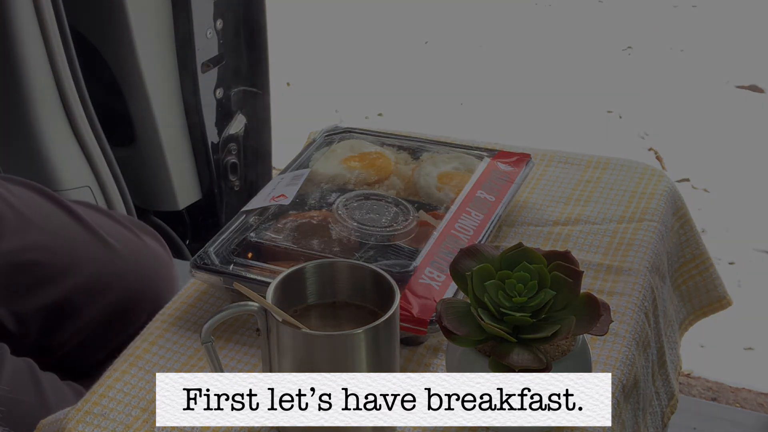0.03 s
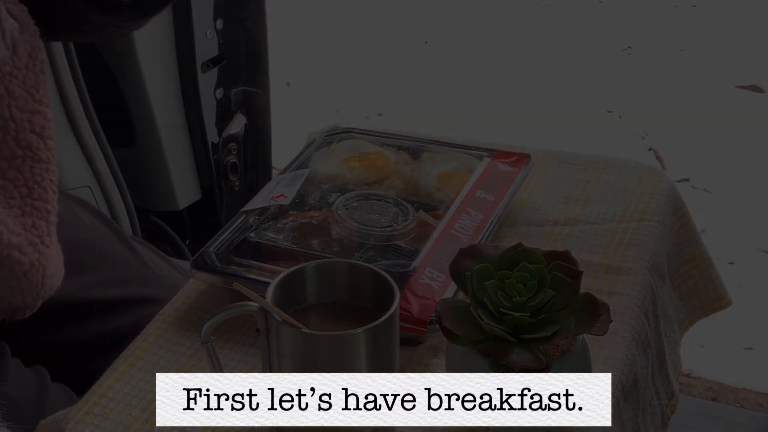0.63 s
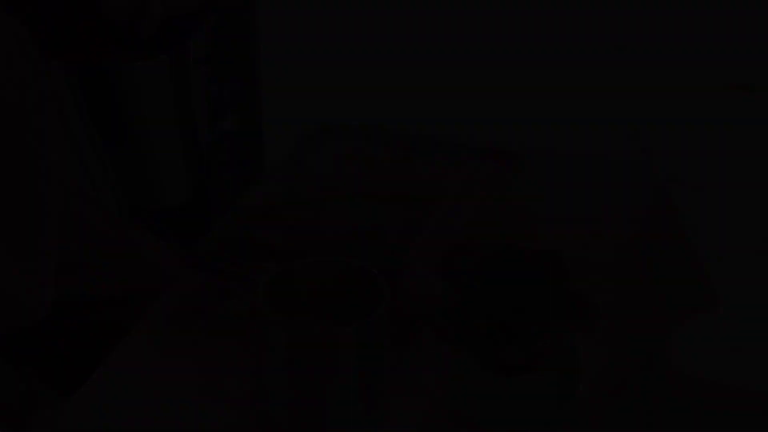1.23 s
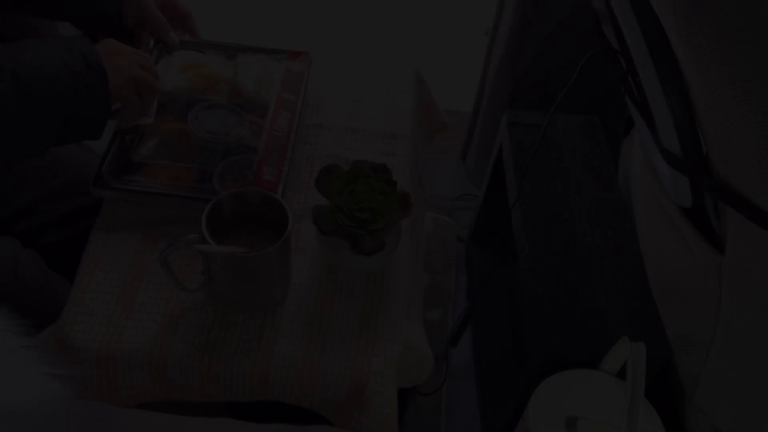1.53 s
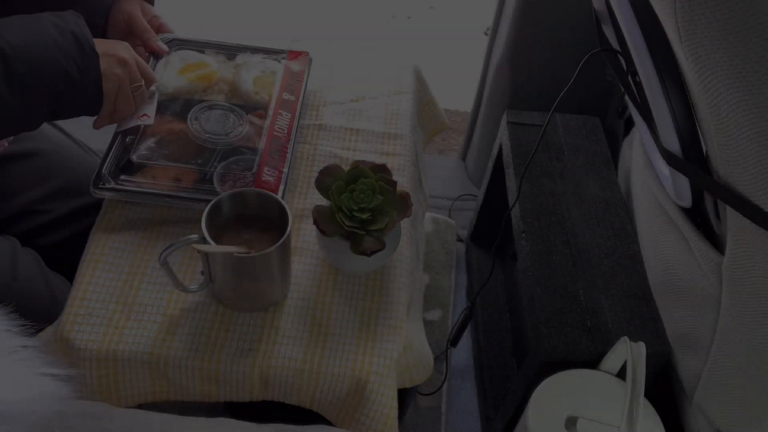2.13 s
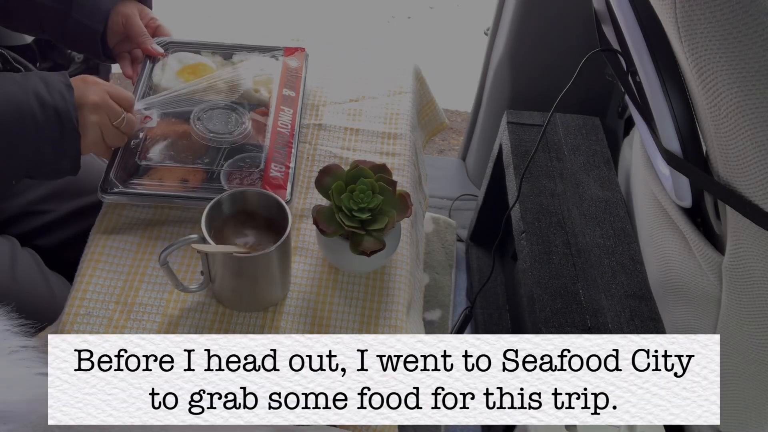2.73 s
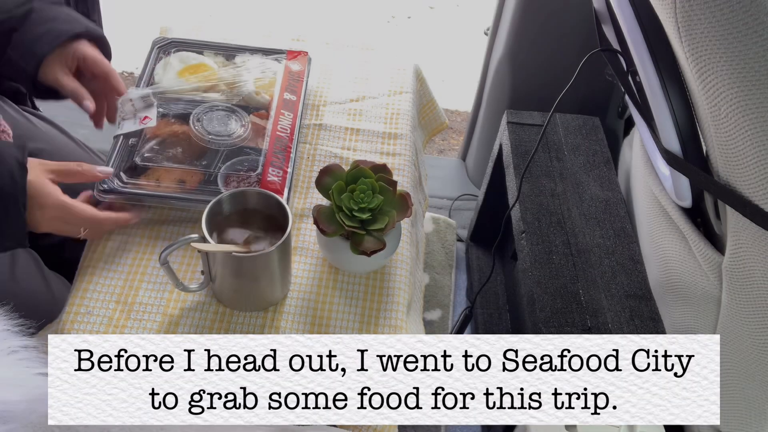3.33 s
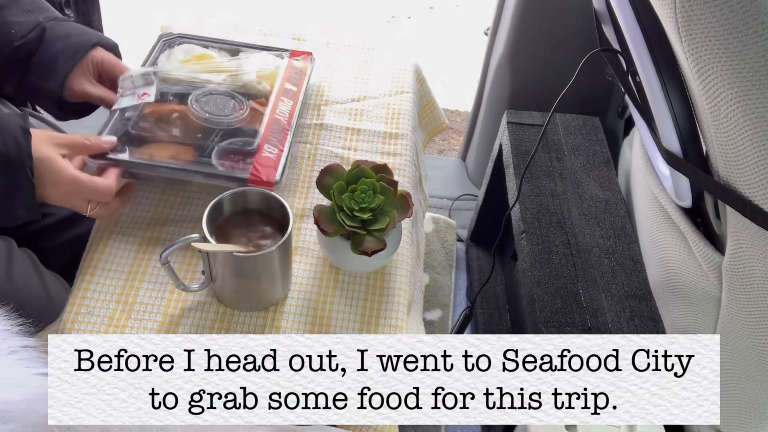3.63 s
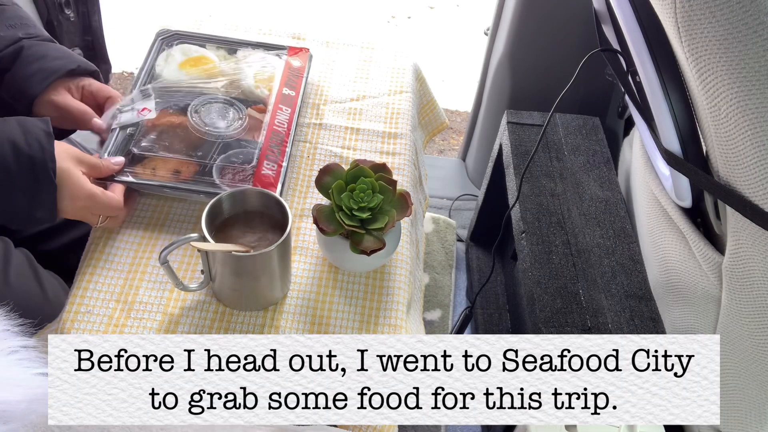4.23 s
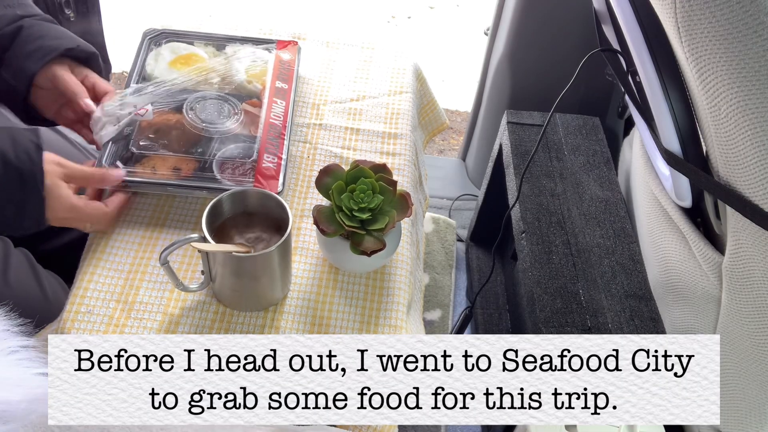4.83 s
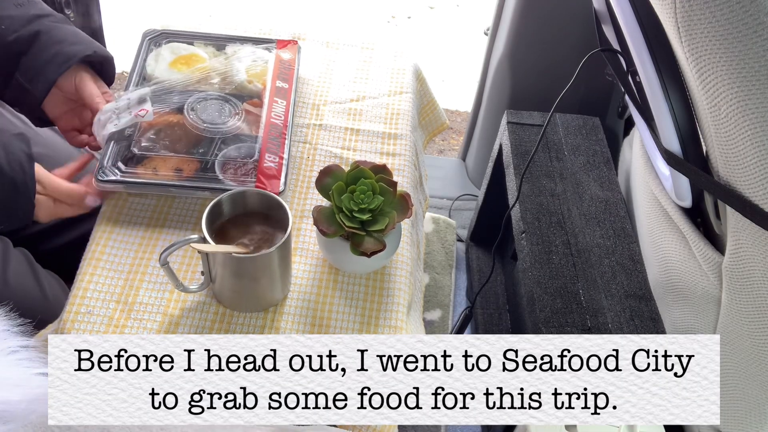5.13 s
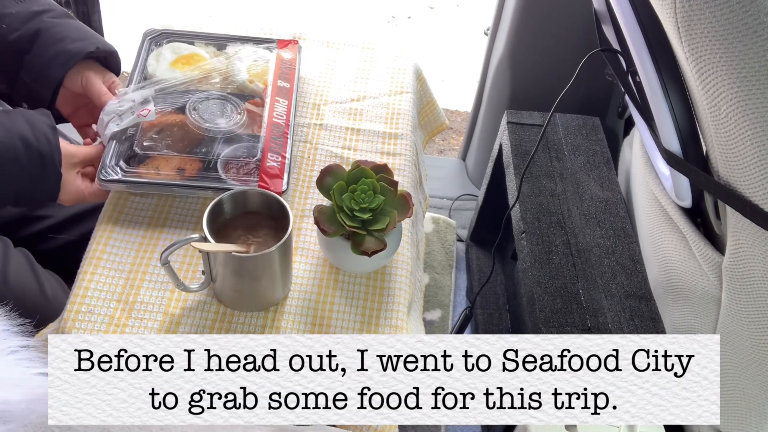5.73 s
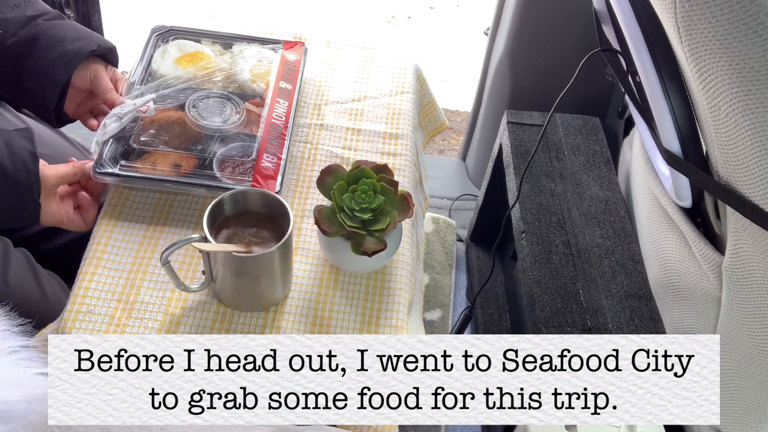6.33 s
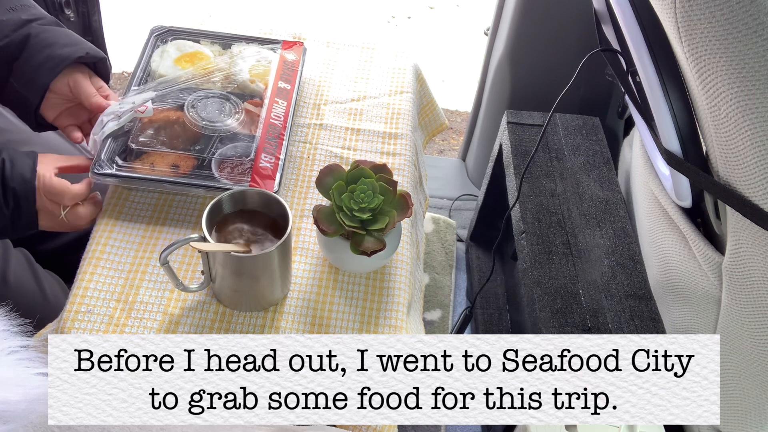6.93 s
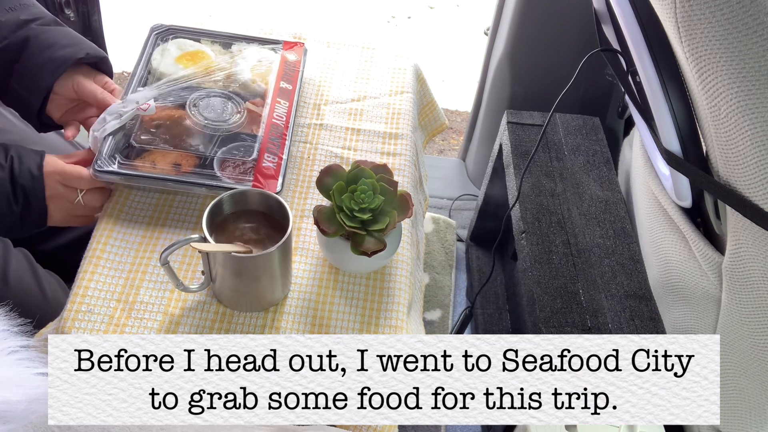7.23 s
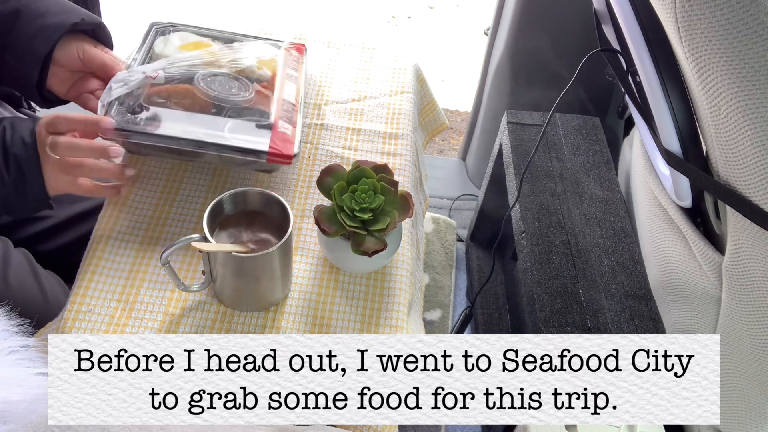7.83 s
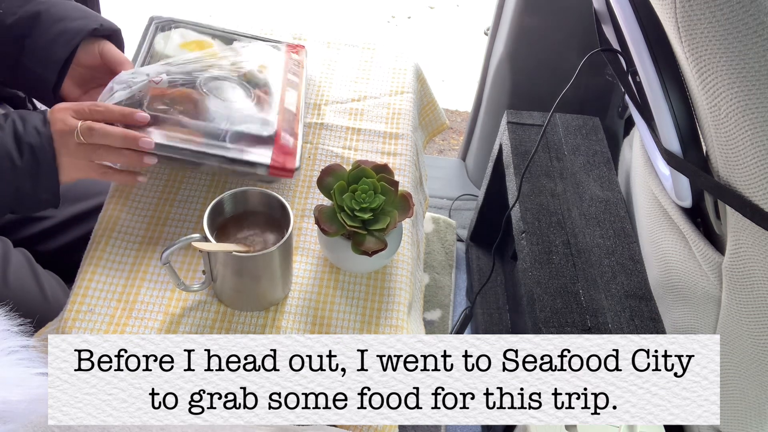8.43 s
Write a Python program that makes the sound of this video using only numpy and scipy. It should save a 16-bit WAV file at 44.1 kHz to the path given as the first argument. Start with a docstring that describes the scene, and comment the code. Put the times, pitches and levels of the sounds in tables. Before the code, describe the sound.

A soft hiss and low drone die down over the first second, leaving the hush of a parked car. From about 1.3 to 3 seconds the microphone is moved: low rumble, scuffs and several dull knocks, with a faint wavering whine until 2 seconds. Meanwhile, close by, hands begin picking cling film off a plastic meal tray. From 2 to 3.2 seconds the film crinkles and buckles in sharp snaps that make the stiff lid and tray ring briefly. After a few scattered clicks, the densest crackling runs from 4 to 5 seconds, strongest around 4.5. Lighter tugs, ticks and small pops continue until about 7 seconds, with fingers rubbing and dragging on the plastic between them. The handling goes softer, then two sharp cracks come at about 7.8 and 8 seconds, followed by a little fine crinkling until around 8.5.

```python
"""A soft hiss and a low drone die down, then hands pick cling film off a plastic meal tray.
Folds of film buckle in sharp snaps that set the stiff lid and the tray ringing.
Between the snaps the film crinkles and fingers rub and drag, all inside a quiet parked car.
Early on the camera rumbles, knocks and faintly whines while it is moved."""
import sys
import numpy as np
from scipy import signal
from scipy.fft import rfft, irfft, next_fast_len
from scipy.io import wavfile
from scipy.ndimage import map_coordinates

SR = 44100
rng = np.random.default_rng(int(sys.argv[2]) if len(sys.argv) > 2 else 0)


def output_pcm(signal):
    """Save a mono or channel-first signal as 16-bit PCM at the path in sys.argv[1].

    Samples are clipped to [-1, 1] before scaling.
    """
    pcm = np.clip(np.atleast_2d(signal).T, -1, 1) * 32767
    wavfile.write(sys.argv[1], SR, np.round(pcm).astype(np.int16))


N = 373968

# the background hiss dying down: time_s, level_db
HISS_LEVELS = [(0, -60), (0.12, -59.5), (0.3, -64), (0.5, -67.5), (0.62, -74), (0.9, -75.5), (1.05, -73.5)]
# the tone of each noise, from bass to treble: pitch_hz, level_db
HISS_TONE = [(100, -5.5), (250, -7.5), (550, -0.5), (1100, -6.5), (2000, -8.5), (3800, -9), (6000, -9.5),
             (9000, -25.5), (12000, -18), (16000, -22.5)]
DRONE_TONE = [(20, -15), (45, -6), (65, 0.5), (95, -1), (140, -11), (250, -18.5), (500, -57)]
RUMBLE_TONE = [(18, -16), (29, -10), (45, 1.5), (70, 4.5), (100, -1), (140, -15.5), (300, -33)]
SCUFF_TONE = [(90, -0.5), (160, -1), (310, 1.5), (430, -3.5), (600, -13.5), (1000, -18), (2500, -33.5)]
RUB_TONE = [(150, -6), (330, 8.5), (540, 11.5), (800, 4.5), (1100, 0), (1500, -24), (2300, 5), (3800, 7),
            (5200, 2.5), (7000, 2), (9500, -69), (15000, 0.5)]
# how alike a noise is in the two ears: pitch_hz, likeness (1 means the same)
EAR_LIKENESS = [(60, 0.93), (200, 0.62), (400, 0.5), (700, 0.19), (1500, 0.45), (3500, 0.17), (6500, 0.047),
                (9500, 1), (15000, 1)]
# fingers and tray dragging: start_s, end_s, level_db, slips_per_s, ring_hz
DRAGS = [(1.039, 1.105, -70, 120, 1100), (1.149, 1.205, -69, 99, 1240), (1.785, 1.827, -51.5, 295, 1040),
         (1.867, 1.909, -52, 220, 3440), (3.356, 3.47, -57.5, 340, 1130), (3.44, 3.493, -53, 470, 2850),
         (3.492, 3.56, -61, 260, 1140), (3.736, 3.784, -52, 260, 2540), (5.557, 5.68, -74.5, 260, 1820),
         (5.741, 5.815, -58, 190, 3780), (6.453, 6.508, -67, 280, 2320), (7.22, 7.324, -66.5, 182, 1720),
         (7.479, 7.562, -59, 210, 1240), (7.629, 7.7, -56, 265, 3740), (7.757, 7.792, -51.5, 340, 3170),
         (7.909, 7.978, -69, 340, 1100), (8.12, 8.195, -57.5, 330, 3600), (8.181, 8.231, -54.5, 280, 1700),
         (8.272, 8.374, -57, 167, 3830)]
# the camera is gripped, moved and let go: time_s, rumble_db, scuff_db
GRIP_LEVELS = [(1.04, -66, -65), (1.315, -68, -84), (1.34, -39, -56.5), (1.8, -50.5, -51),
               (2.08, -44, -40.5), (2.28, -33, -65), (2.55, -54, -54.5), (2.95, -51.5, -67.5),
               (3.17, -59.5, -57.5)]
# bumps on the camera: start_s, thud_db, knock_db, decay_s
CAMERA_BUMPS = [(1.075, -75, -59, 0.039), (1.168, -74, -58.5, 0.039), (1.391, -57, -39, 0.041),
                (2.022, -33.5, -30, 0.018), (2.178, -48, -30, 0.056), (2.242, -29.5, -58, 0.098),
                (2.723, -27, -54, 0.059)]
# the camera wobbling on its mount: pitch_hz, level_db
MOUNT_WOBBLES = [(29, 1.5), (71, 4), (87, -4.5)]
# the faint whine of the mount: time_s, pitch_hz, level_db
MOUNT_WHINE = [(1.31, 850, -99), (1.34, 825, -65), (1.45, 785, -66), (1.53, 768, -57), (1.6, 777, -68),
               (1.75, 801, -69), (1.94, 821, -62), (2.05, 858, -63)]
# the louder folds buckling: start_s, slip_ms, tray_db, lid_db, film_db, pitch_hz
BIG_FOLDS = [(1.2, 0.98, -64, -61, -90, 570), (1.4345, 0.22, -50.5, -43.5, -62, 3900),
             (1.6954, 1.6, -56, -55.5, -54, 4930), (1.8077, 3, -44.5, -48, -54, 750),
             (1.8773, 0.23, -48, -48.5, -57, 590), (2.031, 0.8, -50, -54, -51, 455),
             (2.0429, .1, -70, -58, -55, 1000), (2.085, 0.45, -54, -50.5, -55, 4000),
             (2.1317, 0.43, -47.5, -47, -53, 680), (2.1522, 0.45, -56, -48.5, -52, 4000),
             (2.1848, 1.4, -36.5, -43.5, -46, 600), (2.2099, 0.38, -41, -38, -31.5, 2070),
             (2.2133, 5.3, -35.5, -34.5, -28, 1950), (2.2591, .5, -58, -60, -46, 4470),
             (2.2947, 0.26, -46, -45, -59, 440), (2.3061, .2, -45.5, -46, -58, 2900),
             (2.3179, 0.29, -42.5, -39, -44, 3000), (2.3258, 2.2, -46, -39.5, -45.5, 593),
             (2.3933, 0.67, -55, -50, -54, 3500), (2.429, .3, -56, -47, -47, 5000),
             (2.452, 0.32, -52.5, -52, -45, 4200), (2.4716, 2.1, -58, -37.5, -36, 3260),
             (2.5037, 2.2, -62, -47.5, -43.5, 4000), (2.5592, 0.41, -58, -45, -58, 2700),
             (2.566, .3, -58, -58, -46, 5000), (2.5762, 1.9, -53, -45, -46, 3500),
             (2.5878, 0.46, -48, -60, -47.5, 1020), (2.6048, .06, -66, -60, -56, 4600),
             (2.646, 3.4, -40.5, -36.5, -43, 960), (2.6803, 1.2, -45, -42.5, -43.5, 4980),
             (2.7238, 0.17, -60, -52.5, -66, 3100), (2.7408, 0.44, -58, -52, -72, 3000),
             (2.7675, 0.47, -73, -68, -51.5, 450), (2.8296, 1.3, -59, -51.5, -56, 5030),
             (2.8614, 0.28, -38.5, -37, -67, 596), (2.8969, .1, -66, -54, -56, 3600),
             (2.9235, 0.29, -40.5, -42, -71, 600), (3.0101, 6.2, -33.5, -35.5, -43.5, 1600),
             (3.0401, 0.2, -54, -64, -50, 500), (3.1299, 1.4, -48.5, -52, -64, 1190),
             (3.2109, 0.19, -71, -60, -60, 5000), (3.2369, 0.16, -95, -60, -48, 5500),
             (3.6053, 7, -51, -60.5, -85, 1180), (3.6581, 0.74, -58, -36.5, -47.5, 4040),
             (3.6873, 1.4, -50, -58, -64, 1060), (3.7623, 0.33, -50, -50.5, -54, 4930),
             (3.8737, 0.97, -55, -53.5, -57, 4130), (3.9057, 1.7, -49.5, -61, -81, 1130),
             (3.9976, 3.6, -49.5, -46, -51, 5360), (4.0162, .1, -65, -60, -54, 4100),
             (4.0349, 0.32, -54, -54.5, -64, 2500), (4.0653, 6, -46.5, -46, -58, 606),
             (4.0723, 0.65, -52, -53, -51, 1288), (4.0785, .1, -60, -49, -49, 5600),
             (4.1002, 0.17, -53.5, -48.5, -48, 5460), (4.1495, 4.5, -46.5, -40.5, -42.5, 3500),
             (4.1606, .1, -55, -47, -48, 2800), (4.169, .06, -70, -56, -49, 3100),
             (4.1958, 0.091, -60, -46, -68, 2677), (4.22, .1, -70, -50, -52, 6100),
             (4.2264, .2, -56, -47, -47, 4200), (4.2497, 0.12, -48.5, -44, -41, 4830),
             (4.2744, .8, -44, -37.5, -35.5, 3460), (4.2823, .2, -60, -45, -42, 3400),
             (4.2967, .1, -54, -48, -50, 5000), (4.3113, .2, -58, -48, -47, 5100),
             (4.323, .08, -70, -46.5, -57, 2800), (4.3521, 1.3, -44.5, -52, -59, 620),
             (4.4213, 0.067, -45.5, -30.5, -40, 3810), (4.4649, 2.1, -40.5, -43, -47, 4100),
             (4.4716, 0.3, -39, -30, -29, 2150), (4.4874, .5, -57, -45, -52, 5000),
             (4.5149, 0.33, -54, -37.5, -30, 3920), (4.5538, .1, -70, -50, -48, 5200),
             (4.5595, 0.49, -35.5, -32, -28, 2340), (4.6025, 0.54, -67, -48, -44, 5200),
             (4.6305, 0.3, -47, -49, -47, 4060), (4.6342, 0.18, -40, -32, -31.5, 4300),
             (4.6729, .2, -70, -57, -66, 1900), (4.7348, 0.1, -77, -51, -52, 5430),
             (4.7479, 0.12, -70, -48, -59, 6000), (4.7693, 0.73, -43, -37.5, -39.5, 2940),
             (4.7833, .06, -69, -51, -47, 6900), (4.828, 0.15, -72, -50, -47, 3900),
             (4.842, 1.46, -52.5, -52.5, -51, 1100), (4.8784, .05, -64, -60, -49.5, 5200),
             (4.9495, 3.3, -42.5, -39, -44.5, 4830), (4.9656, 0.037, -73, -50, -46, 5140),
             (4.985, 0.87, -58, -61, -68, 1100), (5.0265, 0.13, -62, -54, -56, 5000),
             (5.0361, 0.088, -57.5, -51, -60, 4600), (5.0815, 1.7, -50.5, -48, -54, 2960),
             (5.1015, 0.3, -55.5, -51.5, -65, 3300), (5.1276, .1, -68, -60, -68, 3900),
             (5.152, 0.46, -57.5, -57, -72, 1800), (5.189, 1.1, -63, -57, -77, 2790),
             (5.2196, 2.3, -49.5, -76, -84, 595), (5.2873, 4, -54, -45, -50, 5200),
             (5.3174, 0.26, -59, -56, -60, 4600), (5.3816, 0.34, -42, -35.5, -48, 1250),
             (5.4823, 0.16, -70, -57.5, -77, 2400), (5.4921, 3.4, -54, -55, -82, 1750),
             (5.5174, 0.4, -54.5, -61, -67, 2600), (5.5361, 0.81, -48.5, -43.5, -46, 3940),
             (5.7912, 1.4, -50.5, -71, -78, 570), (5.8145, .5, -62, -54, -62, 3500),
             (5.8397, 0.41, -52, -44.5, -58, 1700), (5.8808, 0.072, -68, -49, -51, 2500),
             (5.9097, 0.55, -68, -48, -48, 2700), (5.9218, 3.1, -43.5, -57, -55, 625),
             (5.9378, 0.071, -70, -55, -47.5, 4970), (5.9478, 0.33, -63, -64, -54, 4000),
             (5.9946, 1.4, -52.5, -49.5, -63, 2490), (6.0454, 0.091, -56, -56, -57, 565),
             (6.1012, 5, -53.5, -48.5, -45, 3900), (6.1476, 0.59, -58, -52, -56, 1690),
             (6.1824, 0.43, -62, -59, -54, 1100), (6.2085, 0.19, -63, -54, -53, 4680),
             (6.2395, 0.32, -68, -55, -56.5, 4500), (6.321, 0.13, -72, -60.5, -68, 5900),
             (6.4185, 0.1, -63.5, -60.5, -58, 5000), (6.4546, .1, -68, -58, -70, 4380),
             (6.4665, 2.4, -59, -52, -55, 4150), (6.4786, 1.5, -50.5, -50.5, -60, 1100),
             (6.4873, 3, -54, -49.5, -63, 2190), (6.6008, .1, -70, -66, -57, 5000),
             (6.6051, 1.8, -46, -55.5, -61, 584), (6.6529, 0.1, -68, -47, -82, 2920),
             (6.672, 0.36, -57, -67, -75, 4000), (6.8767, 2.8, -50, -43.5, -60, 3270),
             (7.1261, 1.1, -66.5, -51, -76, 4940), (7.1446, 1.6, -53.5, -55, -74, 1130),
             (7.1743, 0.089, -75, -52, -62, 3800), (7.2004, 3.6, -50, -50.5, -61, 3140),
             (7.2073, 0.11, -69, -55, -53.5, 5640), (7.3389, 4.4, -57, -64.5, -67, 500),
             (7.4555, 0.13, -64, -60.5, -68, 4800), (7.6069, 0.13, -66, -59, -67, 3800),
             (7.7713, 0.66, -64, -47, -52, 3200), (7.7887, 0.89, -45, -34, -44, 1130),
             (7.8334, 0.37, -59, -50, -65, 900), (7.9051, 0.2, -79, -53, -63, 3320),
             (8.0054, 1.3, -47.5, -49, -47, 527), (8.0363, 0.55, -40, -26, -32.5, 3760),
             (8.082, .2, -80, -68, -53, 5000), (8.1018, .8, -60, -56.5, -54.5, 1300),
             (8.2672, 0.12, -82, -56, -59, 6000), (8.2774, .1, -81, -55, -69, 3930),
             (8.3626, 1, -57.5, -48, -56, 5500), (8.4153, 0.33, -65, -59, -66, 4970),
             (8.457, 20, -50, -55.5, -68, 1030)]
# high folds are damped more than low ones: pitch_hz, boost_db
FOLD_BOOSTS = [(600, 12), (2000, 5.5), (5000, 7.5)]
# the pitches at which tray, lid and film like to ring: pitch_hz, width_hz, boost_db
TRAY_RINGS = [(532, 124, 12.5), (680, 16, 0), (1098, 166, 8)]
LID_RINGS = [(1720, 33, 7.1), (2250, 16, 3.8), (2960, 68, 3.6), (3570, 183, 3.1), (3810, 310, 3.3),
             (5200, 280, 1.4)]
FILM_RINGS = [(6550, 530, 17.2), (11000, 570, 10), (14450, 1800, 8.8)]
# the hands tug at the film: start_s, end_s, rub_db, crinkle_db
FILM_TUGS = [(1.336, 1.685, -67.5, -74), (1.705, 1.794, -59, -67.5), (1.798, 1.9, -55, -60.5),
             (1.968, 2.15, -61.5, -67.5), (2.16, 2.697, -49.5, -56.5), (2.88, 3.05, -56, -55),
             (3.047, 3.19, -62, -71.5), (3.354, 3.5, -59, -72), (3.645, 3.66, -52.5, -74),
             (3.94, 4.04, -56.5, -65.5), (4.069, 4.318, -55, -56), (4.351, 4.655, -55.5, -56),
             (4.743, 4.84, -60.5, -60), (4.86, 4.978, -59, -58.5), (5.085, 5.214, -62, -76),
             (5.238, 5.31, -56.5, -71), (5.343, 5.528, -66, -81), (5.68, 5.712, -65, -69),
             (5.805, 5.847, -60.5, -73), (5.895, 5.958, -55, -59), (6.028, 6.12, -55, -58),
             (6.129, 6.267, -62.5, -72), (6.455, 6.543, -57.5, -58), (6.536, 6.704, -61, -68),
             (6.725, 6.87, -68.5, -78), (7.04, 7.064, -61.5, -63.5), (7.142, 7.188, -54.5, -67),
             (7.266, 7.459, -69.5, -85), (7.46, 7.982, -63, -75.5), (8.01, 8.166, -63.5, -64),
             (8.185, 8.219, -53, -49), (8.249, 8.44, -69.5, -60.5)]
# a panel of the package pops through: start_s, pitch_hz, level_db, decay_s
POPPING_PANELS = [(2.177, 583, -31, 0.01), (2.211, 2030, -36, 0.017), (2.2133, 1600, -33, .008),
                  (3.01, 1316, -40, 0.0086), (3.13, 1155, -51, 0.022), (4.4724, 545, -42, 0.014),
                  (4.771, 520, -41.5, 0.01), (5.3838, 1620, -45.5, .008), (5.8405, 1670, -34, 0.0038),
                  (7.787, 3240, -24.5, 0.003), (8.0378, 524, -41, 0.0094)]

TIME = np.arange(N) / SR
BLUR_FROM_PER_S, BLUR_OVER_PER_S = 182, 220   # faster slips blur into a scrape
ECHO_MIN_MS, ECHO_MAX_MS, ECHO_DB = .5, 2.2, -10.5   # a crack bounces off the far rim of the tray
DRY_SLIP_MS = 0.096   # slips shorter than this mostly tick, with little ringing
PRESS_SHIFT = 0.07   # finger pressure shifts the ringing pitches by about this share, snap by snap
TABLE_DB, TABLE_LAG_S = -17, 0.01084   # the table answers more softly than the tray, and later


def from_db(db):
    """Turn decibels into a number to multiply a sound by."""
    return 10 ** (np.asarray(db) / 20)


def rms_one(x):
    """Scale a sound so its average strength (rms) is 1."""
    return x / np.sqrt(np.mean(x ** 2) + 1e-20)


def energy_one(x):
    """Scale a sound so its total energy is 1 per channel, on average."""
    return rms_one(x) / np.sqrt(x.shape[-1])


def in_time(rows):
    """Join the rows of a table with straight lines, giving each column a value per sample."""
    times, *columns = np.transpose(rows)
    return [np.interp(TIME, times, column) for column in columns]


def at_hz(points, hz):
    """Look up a value by pitch, with every octave spaced alike."""
    pitches, values = np.transpose(points)
    return np.interp(np.log(hz + 1e-3), np.log(pitches), values)


def add(track, start_s, sound):
    """Mix a short sound into a track."""
    at = max(round(start_s * SR), 0)
    track[:, at:at + sound.shape[-1]] += sound[:, :N - at]


def drift(per_s):
    """A random wander of about size 1, turning per_s times a second."""
    knots = rng.standard_normal(4096)
    return rms_one(np.interp(TIME * per_s, np.arange(len(knots)), knots))


def held(start, end, attack_s, release_s):
    """A loudness shape: rise around the start, hold, die away after the end."""
    rise = np.clip((TIME - start) / attack_s + .5, 0, 1)
    return rise * np.exp(-np.clip((TIME - end) / release_s, 0, 20))


def two_ears(mid, side, alike):
    """Blend two noises into left and right; alike=1 makes both ears the same."""
    alike = np.clip(alike, -1, 1)
    return np.sqrt(1 + alike) * mid + np.sqrt(1 - alike) * side * np.array([[1], [-1]])


def noise(tone, grain=1):
    """Stereo noise with a given tone; a changing grain makes its loudness uneven."""
    size = next_fast_len(N)
    hz = np.arange(size // 2 + 1) * SR / size
    mid, side = rfft(rng.standard_normal((2, N)) * grain, size)
    colour = from_db(at_hz(tone, hz)) / (1 + (hz / tone[-1][0] / 2) ** 4)
    return rms_one(irfft(two_ears(mid, side, at_hz(EAR_LIKENESS, hz)) * colour, size)[:, :N])


def resonance(hz, width_hz, db):
    """A filter that turns the pitches around hz up or down by db."""
    r = np.exp(-np.pi * width_hz / SR)
    poles = np.array([1, -2 * r * np.cos(2 * np.pi * hz / SR), r * r])
    return np.r_[poles + (from_db(db) - 1) * (1 - r * r) / 2 * np.array([1, 0, -1]), poles]


def body(low_hz, high_hz, rings=()):
    """A filter for one object: the range of pitches it gives off, boosted where it rings."""
    band = signal.butter(2, [low_hz, high_hz], "band", fs=SR, output="sos")
    return np.vstack([band] + [resonance(*ring) for ring in rings])


def ringing(ring_ms, tail_ms, tail_db, alike):
    """The quick ringing of thin plastic, plus the short echo of the car's cabin."""
    t = TIME[:SR // 6]
    shape = np.exp(-1000 * t / ring_ms) + from_db(tail_db) * np.exp(-1000 * t / tail_ms)
    return energy_one(two_ears(*rng.standard_normal((2, len(t))), alike) * shape)


def background_hiss():
    """A slightly wavering hiss dies down to the quiet of the cabin."""
    level_db, = in_time(HISS_LEVELS)
    return from_db(level_db) * noise(HISS_TONE, grain=from_db(-0.5 * drift(13)))


def cabin_drone(start_db=-59, rest_db=-68, hold_s=0.11, fall_db_per_s=52):
    """A low drone holds briefly, then fades to a faint level and stays there."""
    fading = from_db(start_db - fall_db_per_s * np.maximum(TIME - hold_s, 0))
    return np.hypot(fading, from_db(rest_db)) * noise(DRONE_TONE) * from_db(1.2 * drift(4))


def finger_drags():
    """Skin and tray stick and slip: a nearly regular buzz of ticks that blurs into a scrape."""
    out = np.zeros((2, N))
    for start, end, db, per_s, hz in DRAGS:
        n = round((end - start) * SR)
        blur = np.clip((per_s - BLUR_FROM_PER_S) / BLUR_OVER_PER_S, 0, 1)
        slip_count = np.cumsum(per_s * np.exp(0.077 * drift(200)[:n])) / SR
        ticks = np.diff(np.floor(slip_count), prepend=0) * from_db(4 * rng.standard_normal(n))
        scrape = rng.standard_normal(n) ** 3
        drag = np.sqrt(1 - blur) * rms_one(ticks) + np.sqrt(blur) * rms_one(scrape)
        drag *= from_db(3.1 * drift(72)[:n])   # the hand presses unevenly
        drag *= signal.windows.tukey(n, .3)   # fade in and out
        spot = from_db(3.0) * ringing(ring_ms=9.3, tail_ms=3.7, tail_db=-7, alike=0.66)
        spot[:, 0] += 1   # the drag itself comes through along with the spot's own ring
        sound = signal.oaconvolve(drag[None], spot, axes=1)
        tray = body(500, 4940, rings=[(560, 120, 9), (1120, 180, 4), (hz, 0.15 * hz, 9)])
        add(out, start, from_db(db) * np.sqrt(n) * energy_one(signal.sosfilt(tray, sound)))
    return out


def camera_grip():
    """The rumble and scuff of a gripping hand travel through the camera body."""
    rumble_db, scuff_db = in_time(GRIP_LEVELS)
    moving = held(GRIP_LEVELS[0][0], GRIP_LEVELS[-1][0], attack_s=0.014, release_s=0.014)
    rumble = from_db(rumble_db) * noise(RUMBLE_TONE)
    scuff = from_db(scuff_db) * noise(SCUFF_TONE, grain=from_db(5.2 * drift(40)))
    return moving * (rumble + scuff)


def camera_bumps(rise_s=0.0041):
    """Each bump gives a hollow knock, and a thud as the camera wobbles on its mount."""
    out, t = np.zeros((2, N)), TIME[:SR // 2]
    hollow = noise(SCUFF_TONE)
    thud = sum(from_db(db) * np.sin(2 * np.pi * hz * t) for hz, db in MOUNT_WOBBLES)
    for start, thud_db, knock_db, decay_s in CAMERA_BUMPS:
        swell = (1 - np.exp(-t / rise_s)) * np.exp(-t / decay_s)
        knock = hollow[:, round(start * SR):][:, :len(t)]
        add(out, start, swell * (from_db(thud_db) * thud + from_db(knock_db) * knock))
    return out


def snaps(folds, part, rings, levels, crack_db, ring_db, ring_ms, tail_db, alike):
    """Each fold strains with tiny slips, then gives way with a crack that shakes one part."""
    out, lead = np.zeros((2, N)), SR // 60
    ms = 1000 * (np.arange(SR // 6) - lead) / SR   # the fold gives way at 0
    for (start, slip_ms, _, _, _, hz), db in zip(folds, levels):
        slips = rng.standard_normal(len(ms)) ** 3   # cubing makes noise spiky
        strain = from_db(-15) * energy_one(slips * (ms < 0) * np.exp(-abs(ms) / 6))
        burst = energy_one(slips * (ms >= 0) * np.exp(-abs(ms) / slip_ms))
        crack = energy_one(burst + (ms == 0) * from_db(crack_db) / (1 + slip_ms))
        echo_ms = rng.uniform(ECHO_MIN_MS, ECHO_MAX_MS)
        echo = from_db(ECHO_DB) * np.roll(crack, round(echo_ms * SR / 1000))
        ring = ringing(ring_ms, tail_ms=28, tail_db=tail_db, alike=alike)
        ring = np.pad(ring, ((0, 0), (lead, 0)))[:, :len(ms)]
        ring_gain = from_db(ring_db) * slip_ms / (slip_ms + DRY_SLIP_MS)
        shake = strain + crack - echo + ring_gain * ring
        fold = resonance(hz, width_hz=0.18 * hz, db=at_hz(FOLD_BOOSTS, hz))
        # every fold sits elsewhere on the package, so some overtones ring and others stay quiet
        overtone_hz = np.exp(rng.uniform(np.log(1500), np.log(14000), 6))
        overtones = [resonance(f, .06 * f, 7 * (-1) ** k) for k, f in enumerate(overtone_hz)]
        shift = np.exp(PRESS_SHIFT * rng.standard_normal())
        pressed = [resonance(f * shift, width, boost) for f, width, boost in rings]
        sound = energy_one(signal.sosfilt(np.vstack([part, *pressed, fold, *overtones]), shake))
        add(out, start - lead / SR, from_db(db) * np.sqrt(SR / 100) * sound)   # level over 10 ms
    return out


def buckling(folds):
    """Every snap sounds in the tray, lid and film; the table beneath gives a soft, low answer."""
    _, _, tray_db, lid_db, film_db, _ = np.transpose(folds)
    no_bass = signal.butter(4, 410, "high", fs=SR, output="sos")
    tray = snaps(folds, np.vstack([body(360, 1750), no_bass]), TRAY_RINGS, tray_db,
                 crack_db=2, ring_db=-2, ring_ms=8.3, tail_db=-16.5, alike=0.75)
    lid = snaps(folds, body(1700, 5920), LID_RINGS, lid_db,
                crack_db=5, ring_db=-1, ring_ms=5.7, tail_db=-24, alike=0.046)
    film = snaps(folds, body(6600, 15500), FILM_RINGS, film_db,
                 crack_db=0.5, ring_db=-2.5, ring_ms=3, tail_db=-25, alike=0.48)
    table = snaps(folds, body(195, 330), [], tray_db + TABLE_DB,
                  crack_db=0, ring_db=8, ring_ms=18, tail_db=-20, alike=.9)
    return tray + lid + film + np.roll(table, round(TABLE_LAG_S * SR), axis=1)


def mount_whine():
    """The camera's mount gives one faint, unsteady note as it moves."""
    hz, level_db = in_time(MOUNT_WHINE)
    unsteady_hz = hz * (1 + 0.0104 * drift(61.1))
    sounding = (TIME > MOUNT_WHINE[0][0]) & (TIME < MOUNT_WHINE[-1][0])
    return sounding * from_db(level_db) * np.sin(2 * np.pi * np.cumsum(unsteady_hz) / SR)


def tug_gains(hold_from_s=1.35, hold_rub_db=-75.5, hold_crinkle_db=-87):
    """How strong the rub and crinkle are: they swell in each tug and stay faint while hands hold on."""
    holding = TIME > hold_from_s
    rub_gain, crinkle_gain = from_db(hold_rub_db) * holding, from_db(hold_crinkle_db) * holding
    for start, end, rub_db, crinkle_db in FILM_TUGS:
        effort = held(start, end, attack_s=0.029, release_s=0.026)
        rub_gain = np.maximum(rub_gain, from_db(rub_db) * effort)
        crinkle_gain = np.maximum(crinkle_gain, from_db(crinkle_db) * effort)
    return rub_gain, crinkle_gain


def crinkle(part, per_s, spread_db, clump_db, ring_db, low_hz, high_hz):
    """Tiny creases pop at random, in clumps, some louder than others."""
    popping = rng.random(N) < per_s * from_db(clump_db * drift(35)) / SR
    pops = popping * rng.choice([-1, 1], N) * from_db(spread_db * np.minimum(rng.exponential(1, N), 3))
    pitches = np.geomspace(low_hz, high_hz, 10)
    places, out = rng.integers(0, len(pitches), N), 0
    for place, hz in enumerate(pitches):   # every place on the plastic rings in its own way
        spot = from_db(ring_db) * ringing(ring_ms=3.2, tail_ms=22, tail_db=-17, alike=.8)
        spot[:, 0] += 1
        spot = signal.sosfilt([resonance(hz, width_hz=0.25 * hz, db=10.5)], spot)
        out = out + signal.oaconvolve((pops * (places == place))[None], spot, axes=1)[:, :N]
    return rms_one(signal.sosfilt(part, out))


def film_crinkle():
    """Creases in the thin film make a fine, bright crackle."""
    film = body(2540, 17100, rings=[(6160, 1100, 12), (10500, 22000, 0.36), (13440, 1400, 10)])
    return crinkle(film, per_s=240, spread_db=3.5, clump_db=3.5, ring_db=-0.5,
                   low_hz=2500, high_hz=14100)


def finger_rub():
    """Fingers on the lid make a light crackle and a grainy rub."""
    shell = body(460, 5500, rings=TRAY_RINGS + LID_RINGS)
    crackle = crinkle(shell, per_s=320, spread_db=4, clump_db=3, ring_db=1, low_hz=1100, high_hz=5500)
    rub = noise(RUB_TONE, grain=from_db(3.5 * drift(450) + 2.5 * drift(50)))
    return rms_one(crackle + 0.75 * rub)


def small_folds(per_s=15, slip_ms=0.11, spread_db=2, low_hz=500, high_hz=5500):
    """Smaller folds give way at random during a tug, near its level; rows as in BIG_FOLDS."""
    chance, sizes = rng.random((200, 2)), rng.standard_normal((200, 3))
    times = (np.arange(len(chance)) + chance[:, 0]) / per_s
    pitches = low_hz * (high_hz / low_hz) ** chance[:, 1]
    offsets_db = spread_db * sizes + [-3.5, 1, -6]   # tray, lid, film
    return [(s, slip_ms, *(db + [rub_db, rub_db, crinkle_db]), hz)
            for start, end, rub_db, crinkle_db in FILM_TUGS
            for s, db, hz in zip(times, offsets_db, pitches) if start < s < end]


def panel_pops(rise_s=0.00048):
    """A panel pops through and rings briefly at one pitch."""
    out, t = np.zeros((2, N)), TIME[None, :SR // 5]
    for start, hz, db, decay_s in POPPING_PANELS:
        swell = (1 - np.exp(-t / rise_s)) * np.exp(-t / decay_s)
        add(out, start, from_db(db) * swell * np.sin(2 * np.pi * hz * t))
    return out


def in_cabin(sound, bounce_ms=3.9, bounce_db=-20.5):
    """A nearby surface throws the sound back, and each ear hears one range a little louder."""
    left, right = sound + from_db(bounce_db) * np.roll(sound, round(bounce_ms * SR / 1000), axis=1)
    return np.array([signal.sosfilt([resonance(510, width_hz=210, db=1.6)], left),
                     signal.sosfilt([resonance(2170, width_hz=1600, db=0.97)], right)])


def scene():
    """Mix everything; the package lies a little to the left, so the right ear hears it later."""
    hiss, drone = background_hiss(), cabin_drone()
    camera = camera_grip() + camera_bumps() + mount_whine()
    rub_gain, crinkle_gain = tug_gains()
    package = crinkle_gain * film_crinkle() + rub_gain * finger_rub() + finger_drags()
    package += buckling(BIG_FOLDS) + buckling(small_folds()) + panel_pops()
    left, right = in_cabin(package) + hiss
    right_lag_ms = .069
    right = map_coordinates(right, [np.arange(N) - right_lag_ms * SR / 1000], order=3)
    return np.array([left, right]) + camera + drone


def record(dry):
    """Cut the highest treble steeply, above 15900 Hz."""
    return signal.sosfilt(signal.ellip(10, .3, 70, 15900, fs=SR, output="sos"), dry)


dry = scene()
out = record(dry)
output_pcm(out)
```